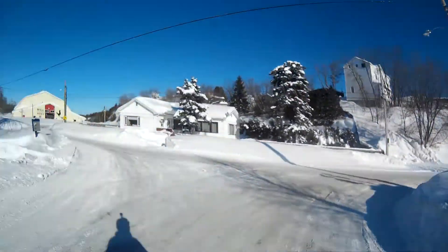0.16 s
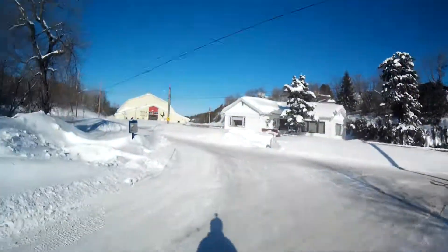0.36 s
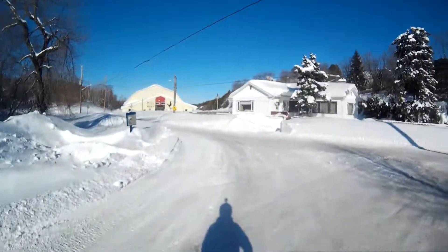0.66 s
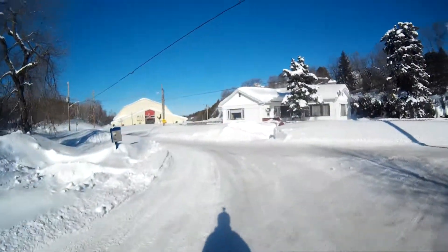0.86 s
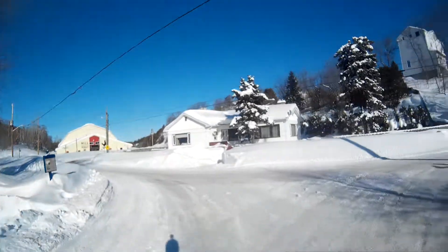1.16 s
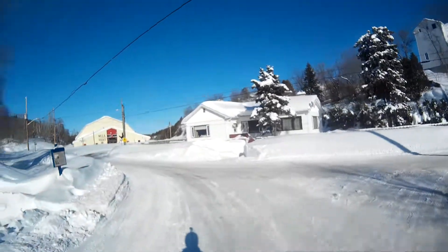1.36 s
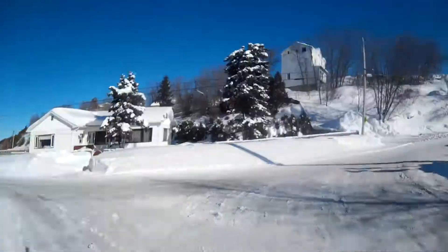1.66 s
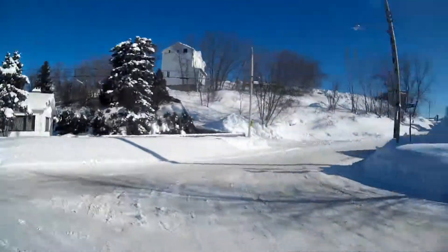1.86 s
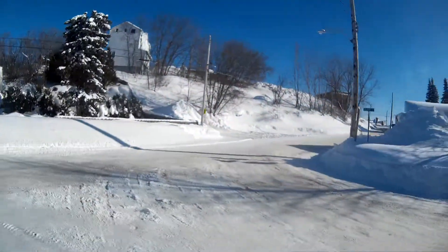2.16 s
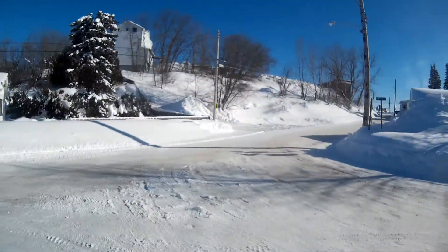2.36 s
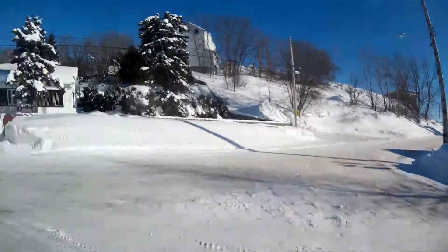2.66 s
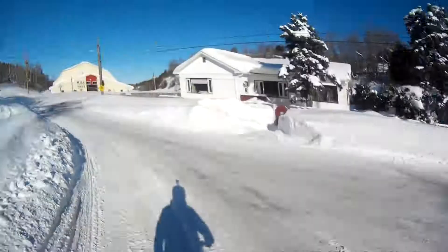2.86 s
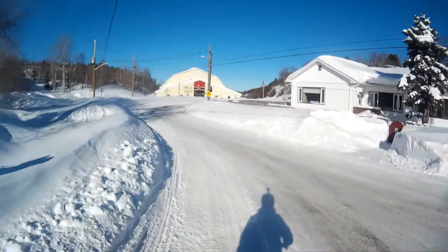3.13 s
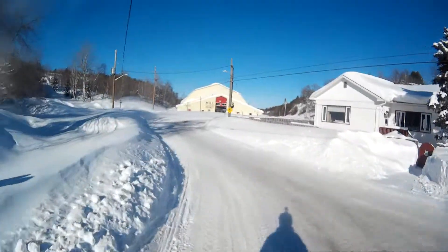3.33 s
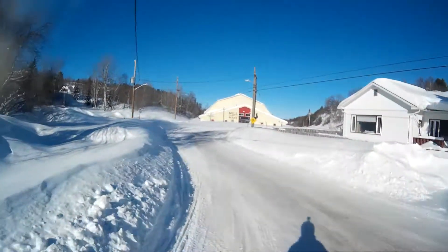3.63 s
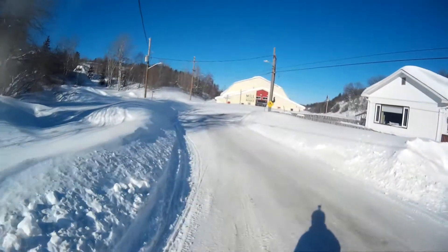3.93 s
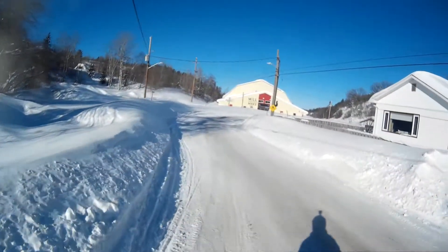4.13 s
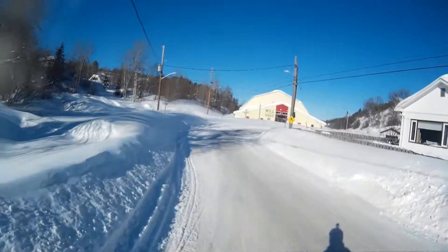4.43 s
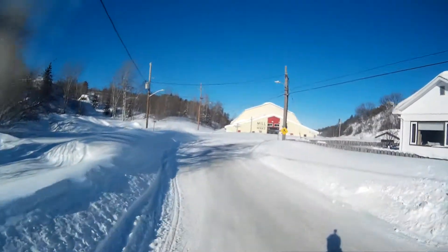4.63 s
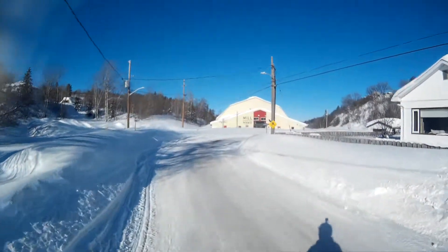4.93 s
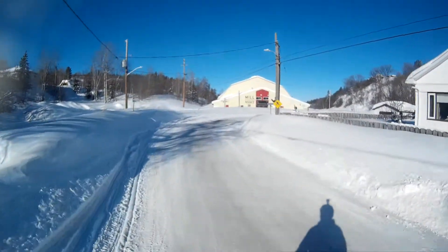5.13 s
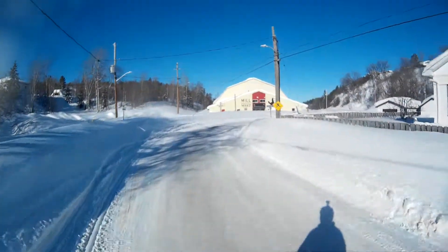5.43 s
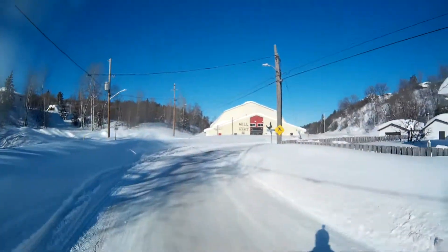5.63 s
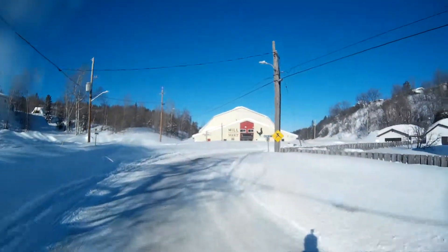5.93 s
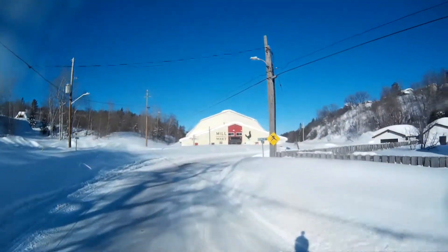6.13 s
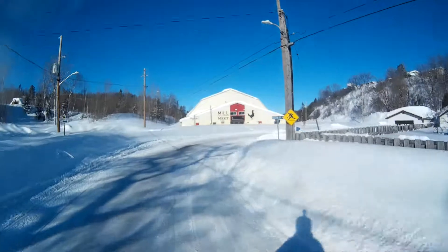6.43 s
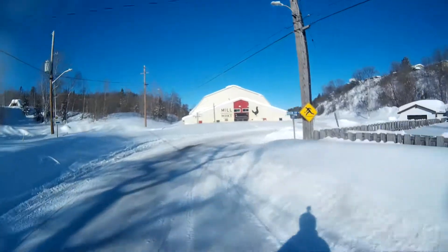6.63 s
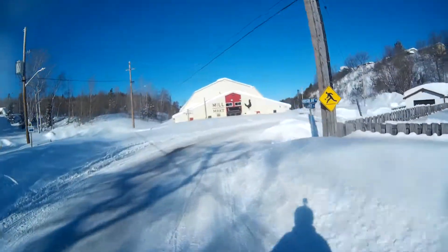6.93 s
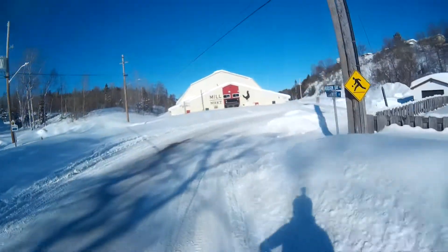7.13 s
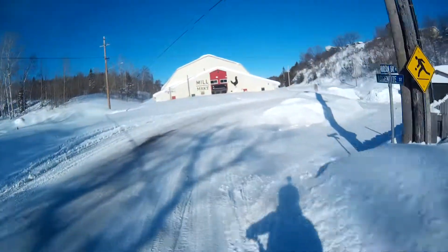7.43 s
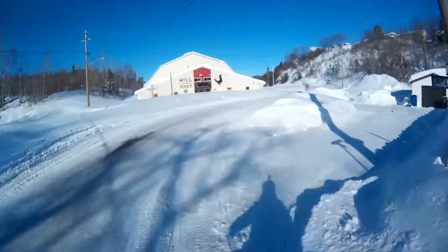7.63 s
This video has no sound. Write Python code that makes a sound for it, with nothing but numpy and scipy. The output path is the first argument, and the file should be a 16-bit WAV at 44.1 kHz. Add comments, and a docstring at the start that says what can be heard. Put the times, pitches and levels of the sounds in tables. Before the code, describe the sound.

Close to a helmet microphone, a booming two-stroke snowmobile engine barks through three short revs, the last after a brief lull. It drones evenly, accelerates to its highest and loudest point with slight overload, then drops back to a lower burble. Track rumble and low wind run throughout, and near the end the skis crunch over crusty snow while bumps in the road knock the suspension.

```python
"""A booming, barking two-stroke snowmobile, heard from the rider's helmet on a packed snowy road.
Three short throttle bursts lead to a cruise, a long pull, then coasting. Each firing of the engine
sends a pulse through the intake, exhaust and hood, and these ring at their own pitches.
Underneath, the track rumbles, ruts knock the frame, the skis scrape and wind buffets the microphone,
which overloads at the loudest moments."""
import sys
import numpy as np
from scipy import signal
from scipy.fft import rfft, irfft
from scipy.io import wavfile
from scipy.ndimage import uniform_filter1d

SR = 44100
rng = np.random.default_rng(int(sys.argv[2]) if len(sys.argv) > 2 else 0)


def persist_wave(psi):
    """Save psi, clipped to +-1, as 16-bit WAV."""
    counts = np.round(np.clip(psi, -1, 1) * 32767).astype(np.int16)
    wavfile.write(sys.argv[1], SR, np.atleast_2d(counts).T)


N = 343098
TIME = np.arange(N) / SR
CONTROL_STEP = 32   # samples between updates of slow changes


def engine_state(flywheel_s=0.06, load_lag_s=0.032):
    """The flywheel smooths each change of speed; the load (how hard the engine works) lags the throttle."""
    # engine speed: (time [s], firing rate [Hz])
    speed = [(0.0, 83.6), (0.35, 85.2), (0.56, 100.0), (0.76, 134.6), (0.86, 127.3), (1.06, 155.7),
             (1.29, 132.6), (1.58, 124.0), (2.06, 104.8), (2.49, 97.8), (2.72, 100.4), (2.96, 142.9),
             (3.12, 125.1), (4.36, 131.2), (4.93, 157.0), (5.12, 186.5), (5.23, 191.1), (5.37, 210.9),
             (5.59, 166.5), (5.87, 142.2), (6.27, 127.3), (6.85, 122.8), (7.07, 114.6), (7.78, 114.2)]
    # the thumb on the throttle: (press time [s], release time [s], opening [0-1])
    presses = [(-0.05, 0.6, 0.38), (0.454, 0.695, 0.61), (0.785, 0.998, 0.74), (0.966, 1.58, 0.09),
               (2.625, 2.896, 0.82), (2.957, 4.48, 0.11), (4.34, 5.25, 0.32), (4.827, 5.093, 0.51),
               (5.102, 5.319, 0.59), (5.333, 6.876, 0.23)]
    firing_hz = uniform_filter1d(in_time(speed), int(flywheel_s * SR), mode="nearest")
    openings = [opening * held(start, end, 0.16, 0.099) for start, end, opening in presses]
    throttle = np.max(openings, axis=0)
    lag = np.exp(-1 / (load_lag_s * SR))
    load = signal.lfilter([1 - lag], [1, -lag], throttle ** 0.45)   # the first bit of throttle adds most
    return firing_hz, throttle, load


def engine_tones(cycle, firing_hz, throttle, load, waver_db=1.17, harmonics=22):
    """Harmonics (multiples of the firing rate) ring the intake, exhaust and hood; the fan adds to two."""
    # boom of the air intake: (frequency [Hz], gain [dB])
    intake = [(80, -11), (110, -4), (145, 1), (200, -4.5), (270, -20), (400, -23.5), (700, -49),
              (3000, -76)]
    # drone of the exhaust pipe: (frequency [Hz], gain [dB])
    pipe = [(90, -10), (260, -8.5), (390, -31), (460, -3), (515, -5), (600, -4.5), (670, -16.5), (780, -41),
            (2000, -49)]
    # ring of the hood: (frequency [Hz], gain [dB])
    hood = [(700, -33), (900, -11.5), (1040, 0.5), (1160, -2.5), (1290, -17), (1420, -8), (1540, -6.5),
            (1680, -13.5), (1850, -21), (2050, -32.5), (2700, -37), (4000, -57)]
    # bark of the exhaust: (frequency [Hz], gain [dB])
    bark = [(120, -8), (250, -10), (330, 3), (410, 3), (580, -3.5), (700, -2), (830, -11.5), (950, -5.5),
            (1070, -7.5), (1300, -18), (1720, -5.5), (2050, -31.5), (2600, -35.5), (4200, -44)]
    # near idle the clutch lets go, and the freed engine loses its voice
    clutch_db = np.interp(firing_hz, [84.4, 91], [-9.8, 0])
    boom_db = engine_db(firing_hz, throttle, base=-27, slower=6, faster=13, push=23)
    drone_db = engine_db(firing_hz, load, base=-26.5, slower=12, faster=8.5, push=8.5) + clutch_db
    hood_db = engine_db(firing_hz, load, base=-38, slower=20, faster=4, push=17) + clutch_db
    bark_db = engine_db(firing_hz, load, base=-49, slower=22, faster=20, push=25) + clutch_db
    paths = [(from_db(boom_db) * per_firing(cycle, spread_db=0.3), intake),
             (from_db(drone_db) * per_firing(cycle, spread_db=0.4), pipe),
             (from_db(hood_db) * per_firing(cycle, spread_db=1.5), hood),
             (from_db(bark_db) * per_firing(cycle, spread_db=0.3), bark)]
    fan = cooling_fan(firing_hz, load, clutch_db)
    steps = slice(None, None, CONTROL_STEP)
    out = np.zeros(N)
    for k in range(1, harmonics + 1):
        hz = k * firing_hz[steps]
        power = sum((level[steps] * gain_at(colour, hz)) ** 2 for level, colour in paths)
        if k in fan:
            power += fan[k][steps] ** 2
        height = np.sqrt(2 * power) * from_db(waver_db * slow_drift(14.8) * (k > 1))
        # echoes under the hood smear the high harmonics, and shift as the rider moves
        smear = (2.04 * rng.standard_normal() + 0.11 * drift(2.6)) * np.tanh(k / 5)
        out += np.interp(TIME, TIME[steps], height) * np.cos(2 * np.pi * k * cycle + smear)
    return out


def cooling_fan(firing_hz, load, clutch_db, harmonic=9):
    """The fan whines, and whistles an octave higher as the cruise ends; gives a strength per harmonic."""
    whine_db = engine_db(firing_hz, load, base=-33, slower=35, faster=-9.5, push=4) + clutch_db
    whistle = from_db(-43) * held(3.98, 4.33, 0.4, 0.4)
    return {harmonic: from_db(whine_db), 2 * harmonic: whistle}


def exhaust_noise(cycle, firing_hz, throttle, load):
    """Uneven firings burble in the pipe off the throttle; with it open, each ends in a sharp spit."""
    # low swirl of gas in the pipe: (frequency [Hz], level [dB])
    burble_colour = [(350, -26.5), (490, 18.5), (590, 13), (660, 4.5), (740, -16), (2500, -74.5)]
    # bright rasp of the spitting gas: (frequency [Hz], level [dB])
    spit_colour = [(1500, -16), (2400, -2.5), (3300, 2.5), (3900, -17.5), (7000, -16), (10000, -29),
                   (15000, -36)]
    burble_db = engine_db(firing_hz, load, base=-31.5, slower=17, faster=8.5, push=-14)
    spit_db = engine_db(firing_hz, throttle, base=-75, slower=6, faster=1, push=41)
    burble = coloured(puffs(cycle, depth=0.74, uneven_db=2.0), burble_colour)
    spit = coloured(puffs(cycle, depth=4, uneven_db=2.5), spit_colour)
    return from_db(burble_db) * burble + from_db(spit_db) * spit


def engine_rattle(cycle, firing_hz, load):
    """A rough clatter whose strength jumps from one firing to the next."""
    # tone of the rattle: (frequency [Hz], level [dB])
    rattle_colour = [(100, -24.5), (300, 1), (590, -1), (780, -16.5), (1130, -1.5), (1400, -5), (1750, -8),
                     (2150, -16.5), (3000, -44.5), (6000, -65.5)]
    level_db = engine_db(firing_hz, load, base=-34.5, slower=7, faster=20, push=5.5)
    return from_db(level_db) * coloured(puffs(cycle, depth=0.16, uneven_db=5.0), rattle_colour)


def engine_hiss(cycle, firing_hz, load, dull_hz=7300, dull_below_db=-50):
    """The engine's hiss loses its highest notes as it dies down off the throttle."""
    # tone of the hiss: (frequency [Hz], level [dB])
    hiss_colour = [(1500, -3), (2500, -1.5), (3200, -7), (4200, -.3), (5200, -1.5), (6000, -10),
                   (6600, -7.5), (7900, -11), (8900, -20), (9800, -19), (11500, -26), (15000, -35)]
    level_db = engine_db(firing_hz, load, base=-49, slower=17, faster=14, push=11.5)
    bright = coloured(puffs(cycle, depth=0.031, uneven_db=1.2), hiss_colour)
    dull = signal.sosfiltfilt(signal.butter(4, dull_hz, fs=SR, output="sos"), bright)
    dull_share = np.clip((dull_below_db - level_db) / 4, 0, 1)
    return from_db(level_db) * (bright + dull_share * (dull - bright))


def track():
    """The rubber track rumbles, and its ridges make small slaps on the snow."""
    # rumble of the track: (frequency [Hz], level [dB])
    track_colour = [(30, -26), (65, -4.5), (110, 2), (165, 1.5), (300, -4.5), (550, -9), (850, -14),
                    (1500, -23), (2200, -29.5), (4000, -43), (8000, -60.5), (15000, -92)]
    rush = rng.standard_normal(N) * from_db(drift(18))
    slaps = 0.6 * grains(per_s=220, spread_db=4.5)
    return running_gain(top_db=-13, doubling_db=12.5) * coloured(rush + slaps, track_colour)


def knocks():
    """Each rut jolts the suspension and rings all the frame's notes, in a new mix every time."""
    # jolts from the ruts: (time [s], relative level [dB])
    ruts = [(0.269, -33), (1.177, -15), (1.218, -4), (2.084, -8.5), (2.093, -10.5), (2.2, -11),
            (2.248, -10.5), (2.318, -10), (2.4, -16), (2.538, -8), (2.658, -9), (6.719, -3.5), (7.012, -6),
            (7.18, -1.5), (7.448, -5.5), (7.574, -6.5)]
    # the frame's notes: (frequency [Hz], relative level [dB], time to fade by 60 dB [s])
    frame_notes = [(145, 8.5, 0.012), (344, -5, 0.016), (560, -3, 0.039), (1040, -13, 0.057),
                   (1480, -11, 0.023), (2530, -33, .007)]
    times, jolt_db = np.transpose(ruts)
    out = np.zeros(N)
    for k, (hz, note_db, fade_s) in enumerate(frame_notes):
        chance_db = rng.normal(0, 1, len(times))
        clicks = np.zeros(N)
        clicks[(times * SR).astype(int)] = from_db(jolt_db + note_db + chance_db - 3.5)
        out += (-1) ** k * ring(clicks, hz, fade_s)
    return out


def skis():
    """Hard snow crunches under the skis, louder through one patch of crust."""
    # scrape of the skis: (frequency [Hz], level [dB])
    ski_colour = [(400, -29.5), (900, 18), (1600, 12.5), (2700, 0), (4500, -8.5), (8000, -38), (15000, -64)]
    crust = from_db(4.5 * held(6.95, 7.45, 0.089, 0.089))
    crunch = grains(per_s=6000, spread_db=2.5) * from_db(1.5 * drift(45))
    return running_gain(top_db=-32, doubling_db=17) * crust * coloured(crunch, ski_colour)


def wind():
    """Swirls of air make a deep rumble on the microphone."""
    # buffeting of the air: (frequency [Hz], level [dB])
    wind_colour = [(18, 13.5), (50, 16), (75, 15.5), (110, -8.5), (300, -50.5)]
    return running_gain(top_db=-23, doubling_db=8) * coloured(rng.standard_normal(N), wind_colour)


def engine_db(firing_hz, effort, base, slower, faster, push, cruise_hz=125):
    """Level in dB: base at cruise, -slower per octave below, +faster per octave above, +push x effort."""
    octaves = np.log2(firing_hz / cruise_hz)
    return base + octaves * np.where(octaves < 0, slower, faster) + push * effort


def running_gain(top_db, doubling_db):
    """Gain of a noise that grows by doubling_db each time the sled's speed doubles."""
    # the sled's speed over the snow: (time [s], share of top speed [0-1])
    pace = [(0, 0.45), (.8, 0.59), (1.6, 0.6), (2.55, 0.44), (3.15, 0.7), (4.5, 0.69), (5.4, 0.98),
            (6.3, 0.86), (7.05, 1.0), (7.78, 0.85)]
    return from_db(top_db + doubling_db * np.log2(in_time(pace)))


def per_firing(cycle, spread_db):
    """Each firing burns with a strength of its own."""
    strength = from_db(spread_db * rng.standard_normal(N // 100))
    return rms_one(np.interp(cycle, np.arange(len(strength)), strength))


def puffs(cycle, depth, uneven_db):
    """Rushing noise that swells with each firing."""
    swell = np.exp(depth * np.cos(2 * np.pi * cycle))
    return rng.standard_normal(N) * swell * per_firing(cycle, uneven_db)


def grains(per_s, spread_db):
    """Tiny hits of uneven size at random times."""
    sizes = from_db(spread_db * np.minimum(rng.exponential(1, N), 3))
    signs = rng.choice([-1, 1], N)
    hits = rng.random(N) < per_s / SR
    return rms_one(sizes * signs * hits)


def ring(clicks, hz, fade_s):
    """Each click starts a pure tone that fades by 60 dB in fade_s."""
    decay = from_db(-60 / (fade_s * SR))
    angle = 2 * np.pi * hz / SR
    return signal.lfilter([0, np.sin(angle)], [1, -2 * decay * np.cos(angle), decay ** 2], clicks + 1e-18)


def coloured(x, spectrum, size=8192):
    """Give x the tone of a body with this spectrum, at an average level of 1."""
    cepstrum = irfft(np.log(gain_at(spectrum, np.arange(size // 2 + 1) * SR / size)))
    # fold onto the first half, so the body rings only after it is struck
    cepstrum[1:size // 2] *= 2
    cepstrum[size // 2 + 1:] = 0
    click_response = irfft(np.exp(rfft(cepstrum)))
    return rms_one(signal.oaconvolve(x, click_response)[:N])


def gain_at(spectrum, hz):
    """Read a (frequency, dB) table as gains at the given frequencies."""
    points_hz, level_db = np.transpose(spectrum)
    return from_db(np.interp(np.log(hz + 1e-9), np.log(points_hz), level_db))


def slow_drift(rate_hz, warm_up=2000):
    """A random wander of size about 1, mostly slower than rate_hz; one value per control step."""
    noise = rng.standard_normal(len(TIME[::CONTROL_STEP]) + warm_up)
    decay = np.exp(-2 * np.pi * CONTROL_STEP * rate_hz / SR)
    return rms_one(signal.lfilter([1], [1, -2 * decay, decay ** 2], noise)[warm_up:])


def drift(rate_hz):
    """The same kind of wander, one value per sample."""
    return np.interp(TIME, TIME[::CONTROL_STEP], slow_drift(rate_hz))


def held(start, end, rise_s, fall_s):
    """Rise towards 1 from start, fall back to 0 from end; all in seconds."""
    return np.clip((TIME - start) / rise_s, 0, 1) * np.clip(1 - (TIME - end) / fall_s, 0, 1)


def in_time(rows):
    """Join (time, value) points with straight lines."""
    return np.interp(TIME, *np.transpose(rows))


def from_db(db):
    """Turn decibels into a gain to multiply by."""
    return 10 ** (np.asarray(db) / 20)


def rms_one(x):
    """Scale to an average (root mean square) level of 1."""
    return x / np.sqrt(np.mean(x ** 2) + 1e-20)


def scene():
    """Engine speed and throttle drive the engine's sounds; the sled's pace drives track, skis and wind."""
    firing_hz, throttle, load = engine_state()
    cycle = np.cumsum(firing_hz * (1 + 0.00154 * drift(16.3))) / SR   # firings so far, slightly unsteady
    tones = engine_tones(cycle, firing_hz, throttle, load)
    exhaust = exhaust_noise(cycle, firing_hz, throttle, load)
    rattle = engine_rattle(cycle, firing_hz, load)
    hiss = engine_hiss(cycle, firing_hz, load)
    ground = track() + skis() + knocks()
    return (tones + exhaust + rattle + hiss + ground + wind())[None]


def record(dry):
    """The microphone drops the deepest rumble, flattens the biggest peaks and cuts the highest treble."""
    low_hz, high_hz, overload = 15, 15700, 0.71
    x = signal.sosfilt(signal.butter(2, low_hz, "high", fs=SR, output="sos"), dry)
    x = np.clip(x, -overload, overload)
    return signal.sosfilt(signal.ellip(10, .1, 80, high_hz, fs=SR, output="sos"), x)


dry = scene()
out = record(dry)
persist_wave(out)
```